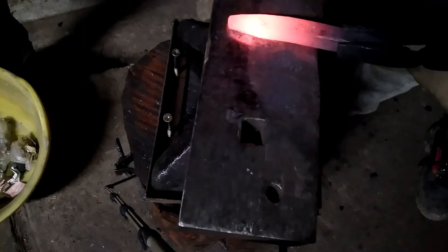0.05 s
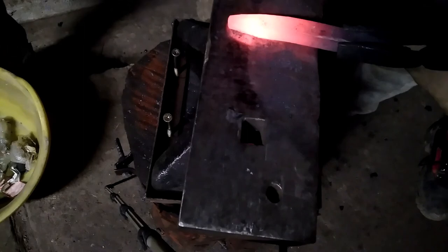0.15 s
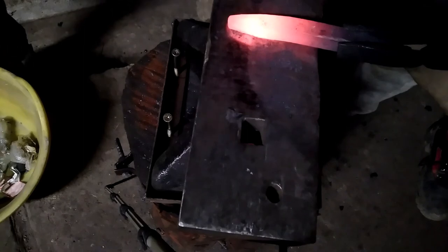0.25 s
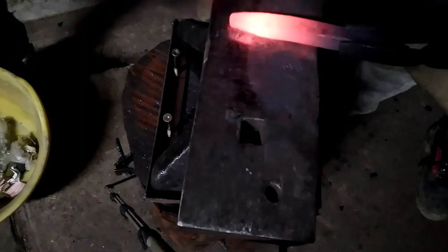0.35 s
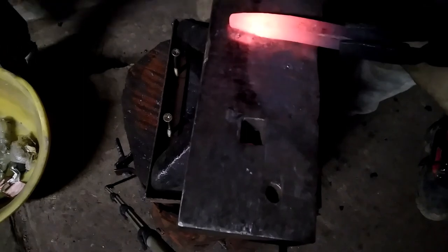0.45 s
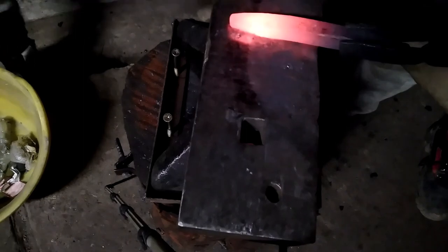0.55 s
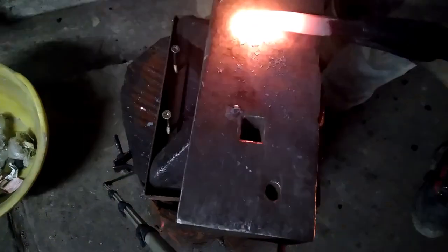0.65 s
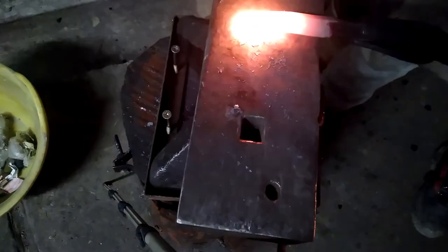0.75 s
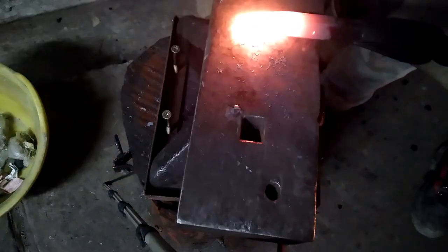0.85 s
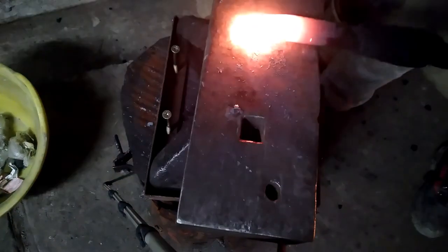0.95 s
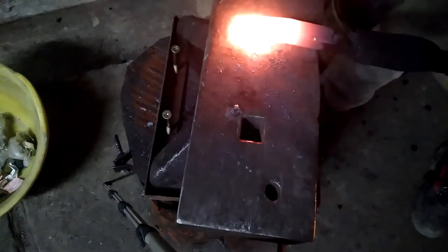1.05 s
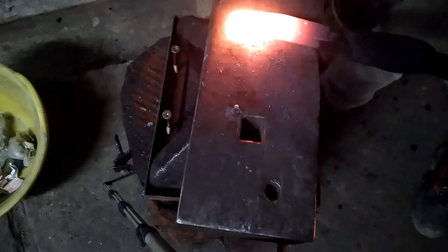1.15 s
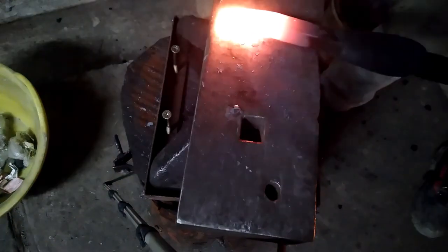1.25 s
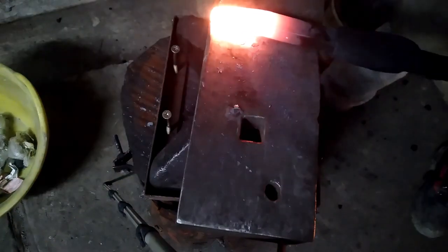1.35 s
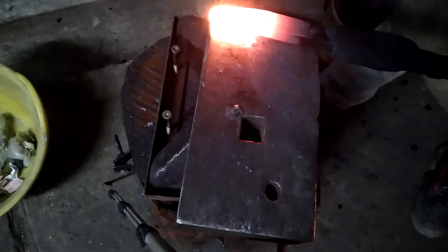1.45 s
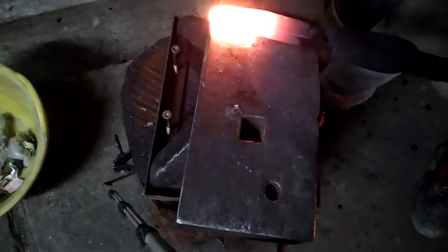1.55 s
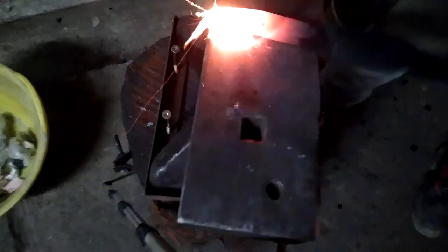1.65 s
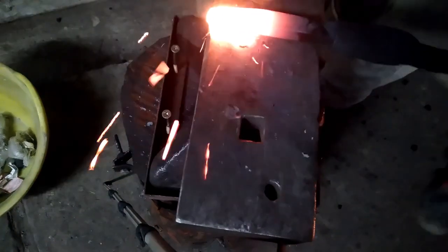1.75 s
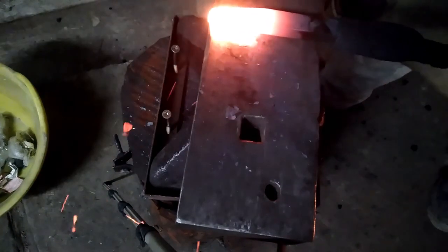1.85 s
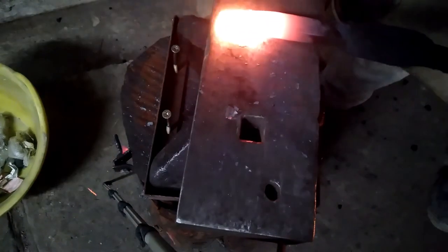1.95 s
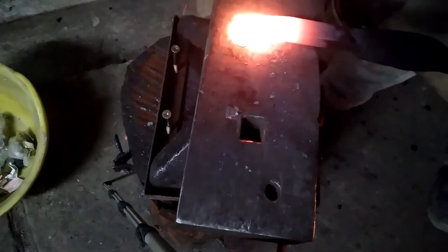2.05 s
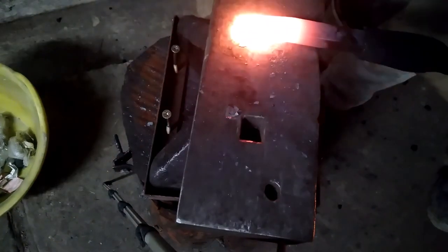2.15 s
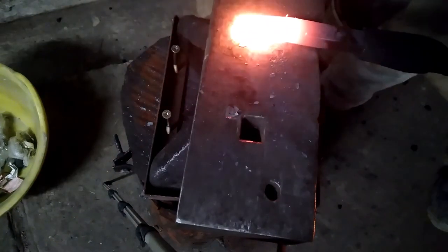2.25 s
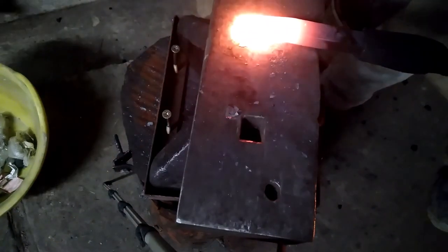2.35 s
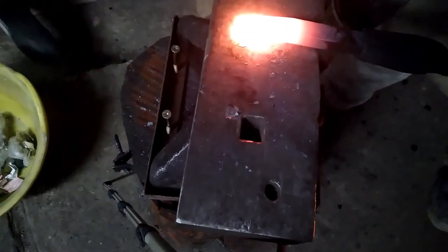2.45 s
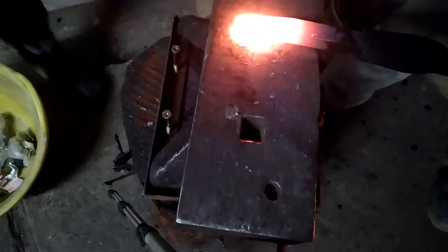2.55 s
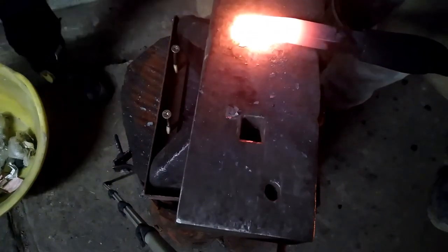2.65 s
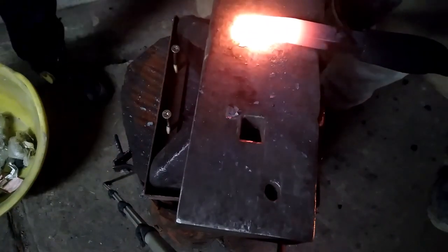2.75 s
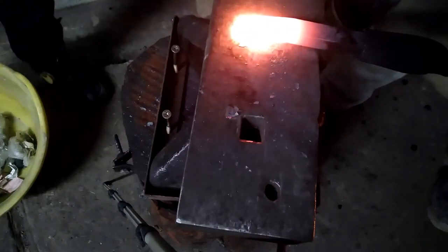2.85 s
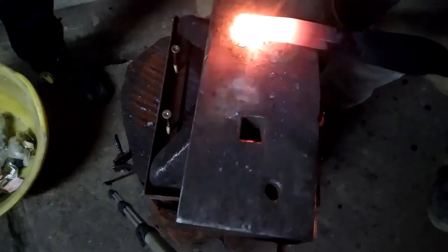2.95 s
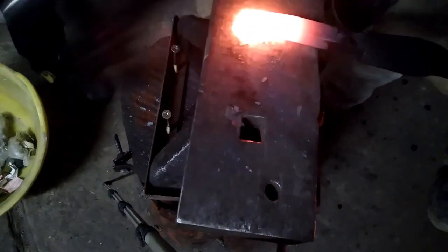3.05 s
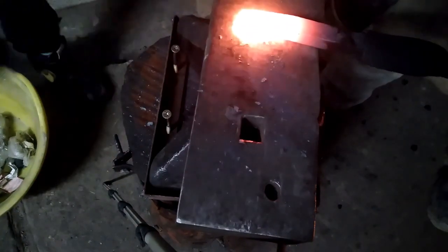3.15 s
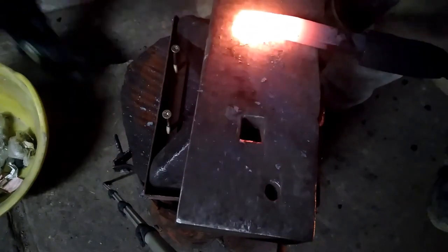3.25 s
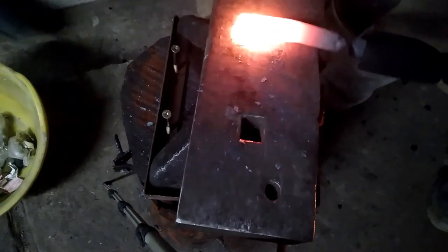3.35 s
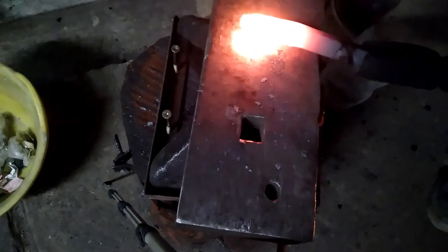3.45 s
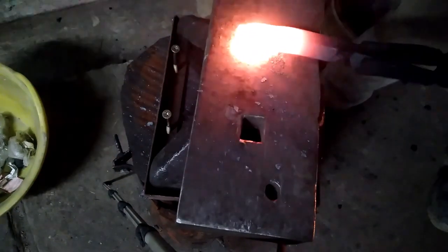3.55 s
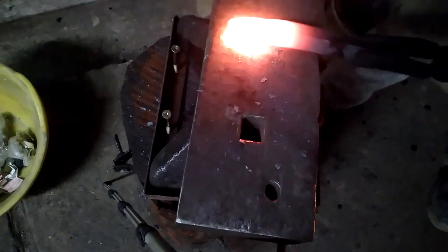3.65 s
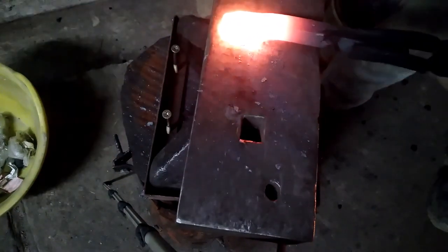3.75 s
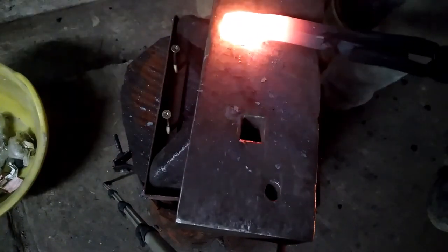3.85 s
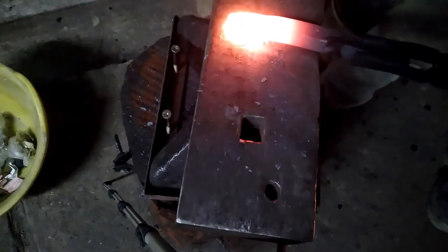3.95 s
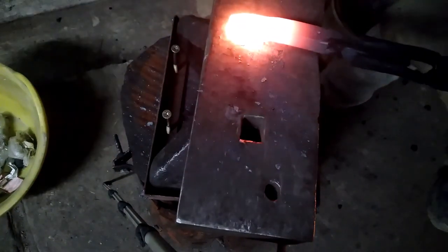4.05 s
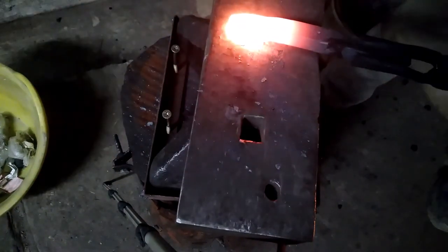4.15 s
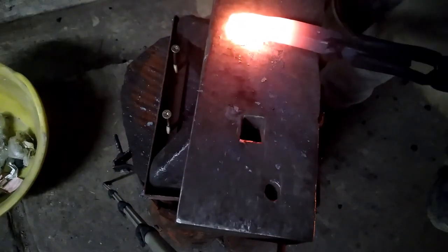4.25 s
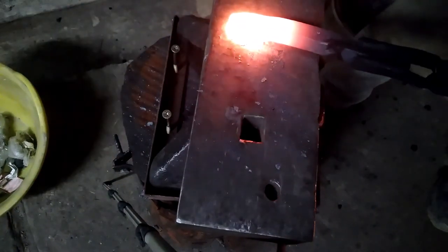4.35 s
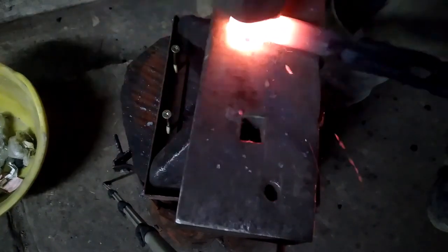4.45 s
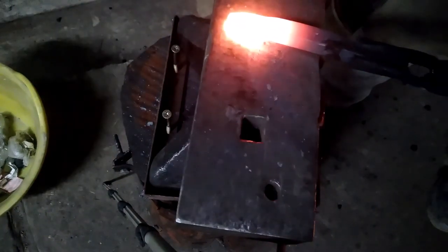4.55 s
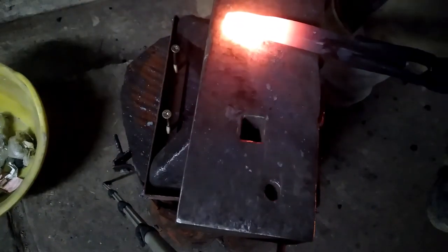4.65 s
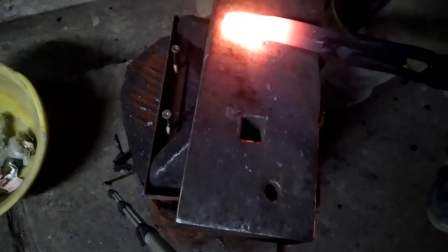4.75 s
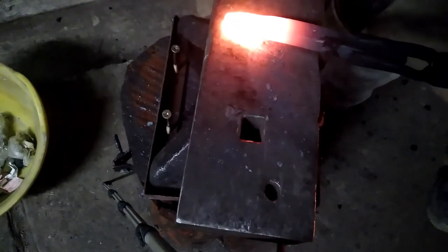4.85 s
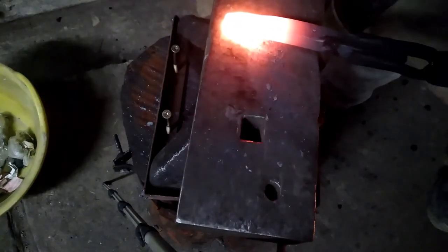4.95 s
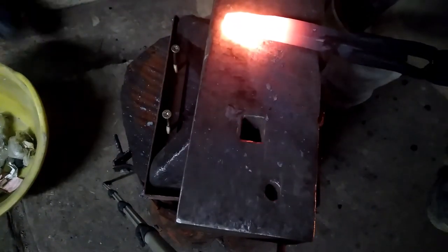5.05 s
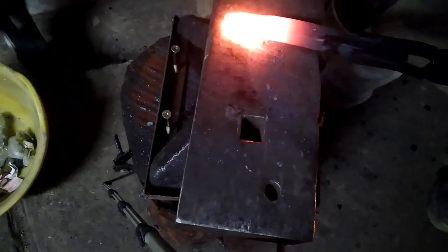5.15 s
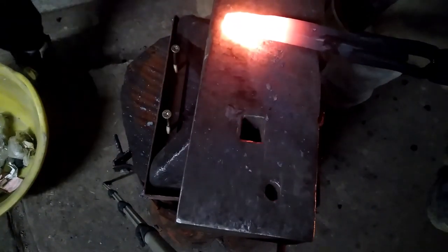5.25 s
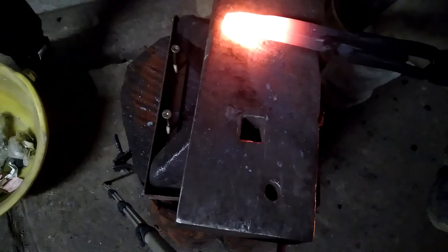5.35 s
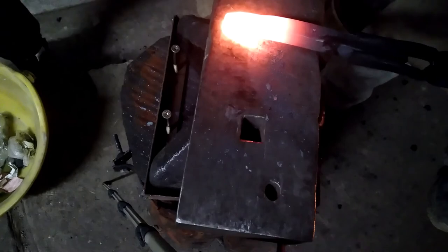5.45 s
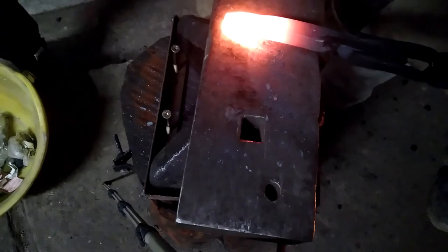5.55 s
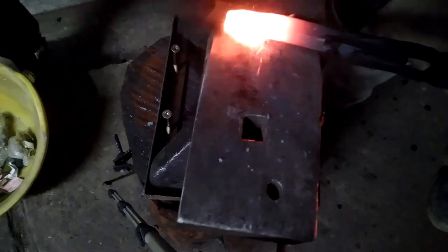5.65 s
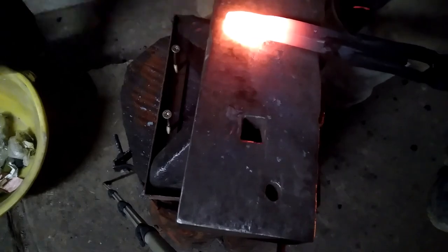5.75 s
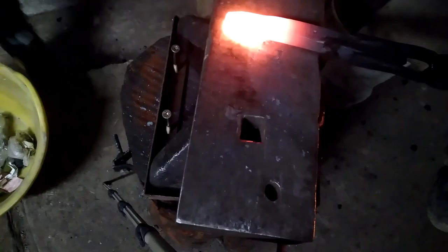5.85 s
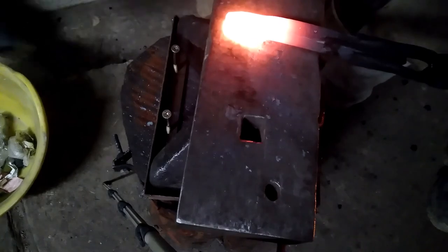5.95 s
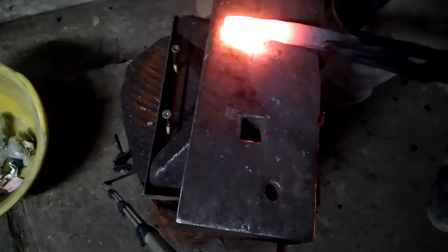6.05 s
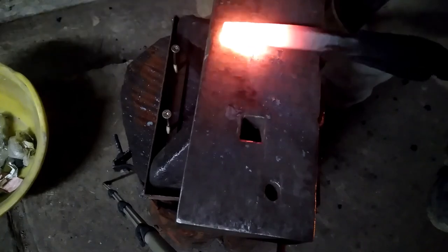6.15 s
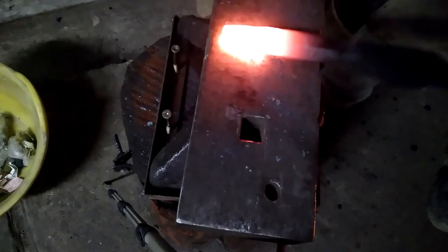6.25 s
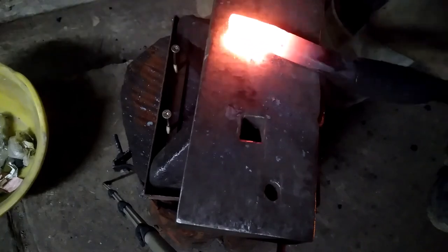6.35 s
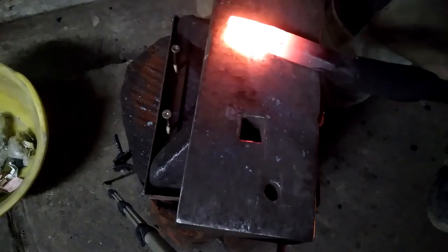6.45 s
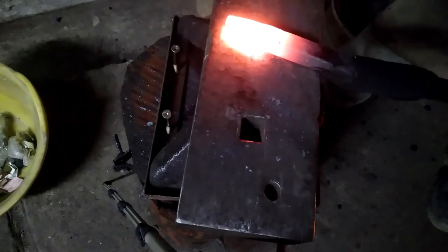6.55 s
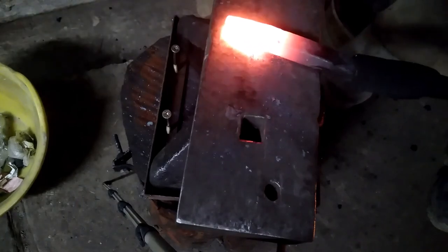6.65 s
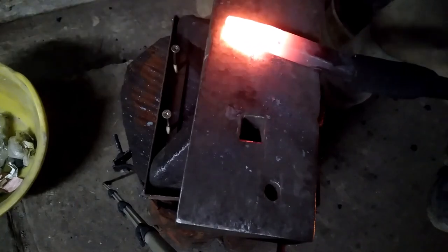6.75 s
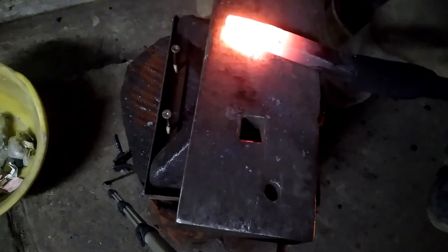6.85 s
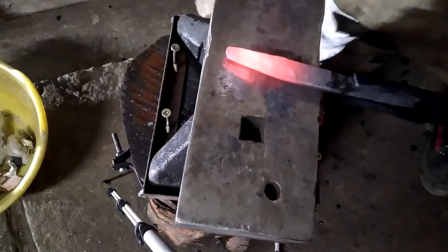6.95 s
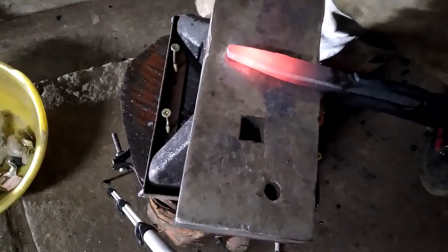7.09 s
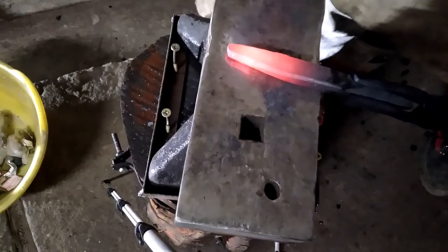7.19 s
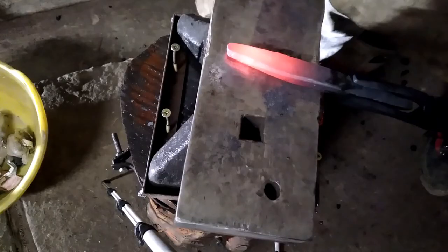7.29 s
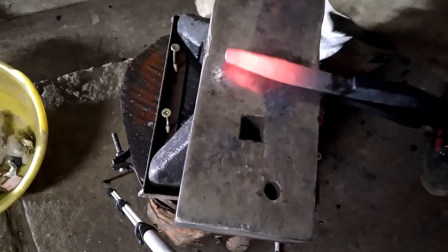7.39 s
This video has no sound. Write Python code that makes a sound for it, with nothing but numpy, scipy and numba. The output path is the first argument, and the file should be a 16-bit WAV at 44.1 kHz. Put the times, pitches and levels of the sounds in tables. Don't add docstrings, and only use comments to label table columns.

```python
import sys
import numpy as np
from scipy import signal
from scipy.fft import rfft, irfft
from scipy.io import wavfile
from scipy.ndimage import uniform_filter1d
from numba import njit

SR = 44100
rng = np.random.default_rng(int(sys.argv[2]) if len(sys.argv) > 2 else 0)


def output_pcm(signal):
    pcm = np.clip(np.atleast_2d(signal).T, -1, 1) * 32767
    wavfile.write(sys.argv[1], SR, np.round(pcm).astype(np.int16))


def volts_from_db(level):
    exponent = np.asarray(level, float) / 20
    return 10 ** exponent


N = 327222
HZ = np.fft.rfftfreq(N, 1 / SR)


def on_log(table, hz, axis=1):
    rows = np.array(table)
    return np.interp(np.log(hz + 1), np.log(rows[:, 0]), rows[:, axis])


def colour(x, table):
    cepstrum = irfft(np.log(volts_from_db(on_log(table, np.fft.rfftfreq(4096, 1 / SR)))))
    one_sided = cepstrum[:2048] * np.r_[1, 2 * np.ones(2047)]
    response = irfft(np.exp(rfft(one_sided, 4096)))[:2048]
    response = response / np.linalg.norm(response)
    return signal.fftconvolve(np.atleast_2d(x), response[None], axes=1)[:, :N]


def add(track, sound, s):
    i = int(s * SR)
    track[..., i:i + sound.shape[-1]] += sound[..., :N - i]


def highpass(x, order, hz):
    return signal.sosfilt(signal.butter(order, hz, "high", fs=SR, output="sos"), x)


def strike(modes, length_s, scatter_db, turn, contact_s, smear_hz=0):
    t = np.arange(int(length_s * SR)) / SR
    hz, db, t60 = np.transpose(modes)[:, :, None]
    chance = rng.standard_normal((2, len(modes), 1))
    size = volts_from_db(db + scatter_db * chance[0]) * 1000 ** (-t / t60) * (1 - np.exp(-t / contact_s))
    steps = rng.standard_normal((len(modes), len(t) // 64 + 1))
    steps = np.repeat(steps, 64, axis=1)[:, :len(t)]
    wander = np.cumsum(steps, axis=1) * np.sqrt(2 * np.pi * smear_hz / SR / 64)
    phase = 2 * np.pi * hz * t + wander
    return np.array([np.sum(size * np.sin(phase + side * turn * chance[1]), 0) for side in (1, -1)])


def burst(t60, like):
    t = np.arange(SR // 4) / SR
    mid, side = rng.standard_normal((2, len(t))) * 1000 ** (-t / t60)
    return np.array([mid + (1 - like) * side, mid - (1 - like) * side])


def stereo_noise(like):
    mid, side = rfft(rng.standard_normal((2, N))) * np.sqrt([(1 + like) / 2, (1 - like) / 2])
    return irfft(np.array([mid + side, mid - side]), N)


def walk(rate):
    k = int(SR / rate)
    return 1.9 * uniform_filter1d(np.repeat(rng.standard_normal(N // k + 1), k), k)[:N]


def blown(noise, peaks):
    gain = sum(volts_from_db(db) / (1 + 2j * (HZ - hz) / width) for hz, width, db in peaks)
    return irfft(rfft(noise) * gain, N) * np.sqrt(SR / np.pi / peaks[0][1])


def rumble():
    low = signal.lfilter(*signal.butter(2, 115, fs=SR), stereo_noise(.9 + 0 * HZ))
    return volts_from_db(-56.5) * low / low.std()


# (frequency [Hz], width [Hz], level [dB])
WHISTLE = [(1058, 37, 4)]


def whistle(noise):
    t = np.arange(N) / SR
    since_peak = t - 1.9
    rise_db_per_s, fall_db_per_s = 4.5, 8
    swell_db = np.minimum(rise_db_per_s * since_peak, -fall_db_per_s * since_peak)
    return blown(noise, WHISTLE) * volts_from_db(-54.5 + swell_db + 2.2 * walk(6.2)) * (t > 0.56)


# (time [s], roar level [dB])
FIRE = [(0.0, -58), (0.25, -62), (0.76, -47.5), (1.3, -51.5), (1.6, -43), (2.3, -42), (2.67, -42),
        (3.3, -44.5), (3.65, -44.5), (4.0, -51), (4.15, -45), (5.0, -45.5), (5.25, -53), (5.45, -51),
        (6.26, -57.5), (6.36, -44), (6.86, -65), (7.42, -65)]
# (frequency [Hz], level per Hz [dB])
ROAR = [(15, -41), (25, -10), (61, -2.5), (91, -26), (113, -13.5), (238, -0.5), (348, -4), (405, -3.5),
        (950, -12), (1240, -40.5), (2090, -120)]
# (frequency [Hz], level per Hz [dB])
HISS = [(530, -29), (900, -7.5), (1060, -10), (1150, -8.5), (1390, -10.5), (2530, -9), (4240, -19.5),
        (8950, -18), (15000, -45.5)]
# (frequency [Hz], width [Hz], level [dB])
BURNER = [(244.7, 6, 0), (292, 14, -6.5), (386, 9.5, -5), (588, 3.5, -6), (667, 6.2, -14)]


def fire():
    roar_db = np.interp(np.arange(N) / SR, *np.transpose(FIRE))
    above_usual_db = roar_db + 46
    hiss_db = -49 + 1.0 * above_usual_db + 0.6 * walk(4) + 1.1 * walk(29)
    burner_db = -54 + 0.8 * above_usual_db + 2.5 * walk(5.4)
    air = stereo_noise(np.exp(-HZ / 500))
    roar = colour(air, ROAR) * volts_from_db(roar_db + 1.2 + 2.2 * walk(14))
    hiss = colour(stereo_noise(np.exp(-HZ / 700)), HISS) * volts_from_db(hiss_db)
    burner = blown(air, BURNER) * volts_from_db(burner_db)
    return roar + hiss + burner + whistle(air)


# (frequency [Hz], level per Hz [dB])
CRACK = [(26, -28.5), (45, -10.5), (120, -5.5), (447, -12), (844, -7), (1080, -13), (1990, -10.5),
         (2540, -19), (3400, -12), (3660, -19.5), (9030, -20), (15500, -48.5)]


def crack(db):
    shock = volts_from_db(-0.5) * burst(0.013, like=0.42) + volts_from_db(-8.0) * burst(0.2, like=0.9)
    tilt_db_per_octave = 0.65 - 0.0667 * db
    tilt = [(1000, 0), (16000, 4 * tilt_db_per_octave)]
    return volts_from_db(db + 10.5) * colour(colour(shock, CRACK), tilt)


# (time [s], crack level [dB], boom level [dB], hammer note level [dB], loose iron level [dB])
BLOWS = [
    (0.265, -9, -19.5, -16, -14.5),
    (1.656, -5.5, -14, -28, -23.5),
    (2.971, -9, -18.5, -35, -13.5),
    (4.368, -12, -14.5, -25, -23),
    (5.625, -9.5, -18, -28, -12.5),
    (7.138, -16, -20.5, -25.5, -15.5),
]
# (frequency [Hz], level [dB], time to fall 60 dB [s])
IRON = [(815, -7, .15), (900, -8, .15), (1810, -12, .15), (1945, -8, .22), (3495, -14, .2),
        (3900, -11, .12), (4620, -17, .1), (5800, -17, .12), (5885, -17, .12), (7450, -18, .1),
        (8720, -19, .08), (9095, -14, .08)]
# (frequency [Hz], level [dB], time to fall 60 dB [s])
STAND = [(57.9, -5, 1.37), (62.07, -6.5, 1.3), (82.7, -9, 0.51), (105.7, -10, .9), (114.7, -5, 1.27),
         (164.6, -10, 0.66), (192.8, -3.5, 0.53), (214.8, -9.5, .5)]


def blows():
    clang, boom = np.zeros((2, N)), np.zeros((2, N))
    for s, db, boom_db, hammer_db, iron_db in BLOWS:
        add(clang, crack(db), s)
        iron = strike(IRON, 0.9, scatter_db=3.0, turn=.9, contact_s=.002, smear_hz=45)
        add(clang, volts_from_db(iron_db + 3) * iron, s)
        note = [(3243, hammer_db + 2, .6)]
        add(boom, strike(note, .8, scatter_db=3, turn=0.97, contact_s=0.007, smear_hz=7.1), s)
        stand = strike(STAND, 1.5, scatter_db=0.5, turn=0.11, contact_s=0.017, smear_hz=3.2)
        add(boom, volts_from_db(boom_db + 1.5) * stand, s)
    return clang, boom


# (main note level [dB], its time to fall 60 dB [s], left minus right [dB],
# 6.6 kHz note level [dB], 7.8 kHz note level [dB])
RINGS = [
    (-32.5, 0.7, -6.5, -42, -43),
    (-7.5, 0.72, -3, -19, -19.5),
    (-18, 0.71, -7.5, -39, -39),
    (-22, 0.59, -10.5, -42, -29),
    (-8, 0.47, -1, -38.5, -21),
    (-6.5, 0.61, -3, -43.5, -58),
]
# (time [s], change of level [dB])
BAR_BACK = [
    (1.906, -2.5),
    (4.671, 5.5),
]
MAIN_NOTE_HZ = 3451.5


def anvil():
    out, t = np.zeros((2, N)), np.arange(int(1.3 * SR)) / SR
    for (s, *_), (db, t60, pan_db, db_6k, db_7k) in zip(BLOWS, RINGS):
        pair = [(MAIN_NOTE_HZ, db + 10.0, 0.92 * t60), (MAIN_NOTE_HZ, db - 15, 2.0 * t60)]
        main = strike(pair, 1.3, scatter_db=0, turn=.25, contact_s=.03)
        high_notes = [(6652, db_6k + 8, .3), (7769, db_7k + 8, .65)]
        upper = strike(high_notes, 1.3, scatter_db=3, turn=0.97, contact_s=0.017)
        damping_db = sum(change_db * (t > at - s) for at, change_db in BAR_BACK if at > s)
        pan = volts_from_db(np.array([[pan_db], [-pan_db]]) / 2)
        add(out, volts_from_db(damping_db) * main * pan + upper, s)
    return out


# (first landing [s], level [dB], first flight [s], share kept by each flight [0-1],
# loss per bounce [dB])
DROPS = [
    (0.357, -15, .04, .6, 5),
    (1.909, -3.5, .082, .6, 3.5),
    (3.024, -5, .047, .58, 6),
    (4.416, -10.5, .029, .6, 2),
    (4.671, -4.5, .074, .39, 8.5),
]
# (time [s], level [dB], jingle level [dB], thud level [dB])
TAPS = [
    (6.306, -38, -35, -2.5),
]


def landings():
    rows, shortest_s = list(TAPS), .011
    for (s, db, flight_s, kept, loss_db), count in zip(DROPS, (1, 13, 3, 2, 5)):
        k = np.arange(count)
        flights = shortest_s + (flight_s - shortest_s) * kept ** k
        times = s + np.cumsum(flights) - flights
        for at, level_db in zip(times, db - loss_db * k):
            jingle_db = -6 + 1.5 * level_db
            rows.append((at, level_db, jingle_db, -21.5))
    return rows


# (frequency [Hz], level per Hz [dB])
CLACK = [(400, -25), (750, -0.5), (950, 2.5), (1600, -4.5), (2800, -6.5), (3500, -12.5), (9000, -21),
         (12000, -36.5)]
# (frequency [Hz], level [dB], time to fall 60 dB [s])
BAR = [(876, -14, 0.06), (915, 8, 0.053), (1150, -8, 0.0092), (1460, -8, 0.013)]
# (frequency [Hz], level [dB], time to fall 60 dB [s])
TONGS = [(3255, -7, .1), (3451, -10, .3), (3895, -1, .13), (3985, -1, .07), (5885, -10, .1),
         (6040, -17, .08), (6660, -15, .12), (7320, -13, .06), (9120, -8, .04), (9520, -14, .08)]


def loose_iron():
    out = np.zeros((2, N))
    for s, db, jingle_db, thud_db in landings():
        duller = [(2800, 0.0054), (8000, 0.8 * db)]
        add(out, volts_from_db(db - 3) * colour(colour(burst(0.017, like=.5), CLACK), duller), s)
        add(out, volts_from_db(db - 17) * strike(BAR, .1, scatter_db=1.5, turn=.4, contact_s=.001), s)
        jingle = strike(TONGS, 0.33, scatter_db=2.0, turn=0.94, contact_s=0.0007, smear_hz=50.7)
        add(out, volts_from_db(jingle_db + 2.0) * jingle, s)
        thud = strike(STAND[5:], .8, scatter_db=4.5, turn=.15, contact_s=0.0037)
        add(out, volts_from_db(db + thud_db) * thud, s)
    return out


# (time [s], fade out [s], fade in [s], main note level [dB], boom level [dB])
CHANGES = [
    (.68, 0.039, 0.032, -46.5, -36.5),
    (7.022, 0.056, 0.028, -78, -43.5),
]


def lingering():
    ring, boom = np.zeros((2, N)), np.zeros((2, N))
    for s, _, _, ring_db, boom_db in CHANGES:
        note = [(MAIN_NOTE_HZ, ring_db, 1.3)]
        add(ring, strike(note, 1.8, scatter_db=7.5, turn=.15, contact_s=.01), s)
        add(boom, volts_from_db(boom_db) * strike(STAND[:2], 1.7, scatter_db=2.5, turn=.2, contact_s=.01), s)
    return ring, boom


# (time [s], level [dB], first crunch above the rush [dB])
SCUFFS = [(0.709, -37, -1), (0.8594, -50.5, 14), (0.9394, -44.5, 5), (1.123, -44.5, 3), (1.2978, -38.5, 12),
          (1.494, -30, -3), (2.3354, -25.5, -3), (2.3565, -33.5, 12), (2.5697, -24.5, -4),
          (2.769, -30.5, 1), (2.846, -31.5, 6.5), (2.8844, -34, 12.5), (3.425, -44.5, 16),
          (3.7444, -38, -2), (3.7988, -37, 4), (4.021, -30, 2), (4.224, -41, 8.5), (4.29, -35.5, 4),
          (4.9013, -39, 0), (4.969, -36.5, 10), (5.349, -46, -7.5), (5.9494, -43.5, 8.5),
          (6.132, -43.5, 9.5), (6.2423, -56, 20), (6.3058, -38.5, 21), (6.4298, -68.5, -2), (6.549, -49, 3),
          (6.6014, -47.5, 10.5), (6.738, -48, 0)]
# (frequency [Hz], level per Hz [dB])
GRIT = [(290, -28), (500, -2.5), (849, -15), (1030, -10.5), (1350, -14), (3520, -14), (8360, -16.5),
        (12700, -32.5), (15000, -35)]


def boots():
    body, top, t = np.zeros(N), np.zeros(N), np.arange(SR) / SR
    t60 = 0.54
    for s, db, crunch_db in SCUFFS:
        rise = volts_from_db(db - 5.5) * (1 - np.exp(-t / 0.017))
        crunch = volts_from_db(db - 7 + crunch_db) * np.exp(-t / 0.0078)
        add(body, rise * 1000 ** (-t / t60), s)
        add(top, rise * 1000 ** (-t / (0.21 * t60)) + crunch, s)
    uneven = volts_from_db(0.29 * rng.exponential(size=N) + 0.5 * walk(60))
    grains = colour(stereo_noise(np.exp(-HZ / 900)) * uneven, GRIT)
    treble = highpass(grains, 2, 3500)
    return top * treble + body * (grains - treble)


# (time [s], level [dB])
FLAKE = [(0.845, -48), (1.122, -44), (3.59, -45), (3.6215, -36), (3.644, -43), (3.6594, -50),
         (3.688, -45.5)]
# (frequency [Hz], level [dB], time to fall 60 dB [s])
FLAKE_NOTES = [(5680, -6, 0.037), (6540, -4, 0.04), (7600, 9, 0.014)]


def flake():
    out = np.zeros((2, N))
    for s, db in FLAKE:
        add(out, volts_from_db(db - 1.0) * strike(FLAKE_NOTES, .1, scatter_db=7.0, turn=1.0, contact_s=0.00046), s)
    return out


# (frequency [Hz], time to fall 60 dB [s], likeness of left and right [0-1])
ROOM = [(59.6, 1.2, 1), (152, 0.81, .95), (420, 0.33, 0.7), (1070, 0.51, 0.1), (2960, 0.45, 0.2),
        (6940, 0.32, 0), (13000, 0.26, 1)]


def room(dry):
    t = np.arange(SR) / SR
    like = np.clip(on_log(ROOM, HZ, axis=2), 0, 1)
    noise, tail = rfft(stereo_noise(like)), 0
    for hz in 60 * 2 ** np.arange(0, 8.5, .5):
        octaves_away = np.clip(np.log2((HZ + 1) / hz), -.5, .5)
        band = irfft(noise * np.cos(np.pi * octaves_away) ** 2, N)[:, :SR]
        tail = tail + band * 1000 ** (-t / on_log(ROOM, hz))
    tail = tail * (1 - np.exp(-t / 0.0027)) / np.sqrt(SR)
    return signal.fftconvolve(dry, tail, axes=1)[:, :N]


def scene():
    background = rumble() + fire()
    clang, boom = blows()
    old_ring, old_boom = lingering()
    boom = boom + old_boom
    ring = anvil() + old_ring
    loose = loose_iron() + flake()
    walls = room(volts_from_db(19.0) * clang + volts_from_db(6.5) * ring + volts_from_db(8.5) * loose + volts_from_db(0.5) * boom)
    return background + clang + boom + ring + loose + walls + boots()


JOLTS = [(0.53, 0.08), (-0.23, -0.26), (0.14, -0.87), (-0.036, 0.36), (0.2, -0.25), (0.22, -0.24)]


def jolts():
    out, t = np.zeros((2, N)), np.arange(SR) / SR
    swing = (1 - np.exp(-t / 0.0074)) * np.exp(-t / 0.056)
    for (s, *_), size in zip(BLOWS, JOLTS):
        add(out, 2.0 * np.outer(size, swing), s)
    return signal.lfilter(*signal.butter(1, 2.5, "high", fs=SR), out)


@njit
def limit(x, top, ratio, attack, release):
    y, level = np.empty_like(x), 0.
    for i in range(x.shape[1]):
        peak = max(abs(x[0, i]), abs(x[1, i]))
        level += (peak - level) * (attack if peak > level else release)
        y[:, i] = x[:, i] * min(1., top / (level + 1e-9)) ** (1 - 1 / ratio)
    return y


def sizzle(x, db, above_hz):
    loudness = uniform_filter1d(np.abs(highpass(x, 6, 4500)), size=400, axis=1) ** 1.87
    return volts_from_db(db) * loudness * highpass(rng.standard_normal(x.shape), 4, above_hz)


def thin_top(x, from_hz, under_db, scatter_db):
    hz, _, cells = signal.stft(x, SR, nperseg=2048)
    power = np.abs(cells[:, :1024]).reshape(2, 64, 16, -1) ** 2
    patch_db = 10 * np.log10(power.sum(axis=2).mean(axis=0) + 1e-18)
    scatter = scatter_db * rng.standard_normal(patch_db.shape)
    weak = patch_db < patch_db.max(axis=0) - under_db + scatter
    cells[:, :1024] *= 1 - np.repeat(weak, 16, axis=0) * (hz[:1024, None] > from_hz)
    return signal.istft(cells, SR, nperseg=2048)[1][:, :N]


# (start [s], end [s])
NO_TREBLE = [(.06, .15), (6.778, 6.875), (6.915, 7.13)]


def gate(x):
    t = np.arange(N) / SR
    shut = sum(1. * (t > start) * (t < end) for start, end in NO_TREBLE)
    shut = uniform_filter1d(shut, size=600)
    return x - shut * signal.sosfiltfilt(signal.butter(6, 850, "high", fs=SR, output="sos"), x)


def change_scene(x):
    t = np.arange(N) / SR
    for s, fade_out, fade_in, *_ in CHANGES:
        x = x * np.clip(np.maximum((s - t) / fade_out, (t - s) / fade_in), 0, 1) ** 1.9
    return x


def roll_off(x):
    return signal.sosfilt(signal.butter(12, 15610, fs=SR, output="sos"), x)


def record(dry):
    heard = signal.sosfilt(signal.butter(2, 10200, fs=SR, output="sos"), dry)
    held = limit(heard, .85, 8., .05, .0006)
    held = held + sizzle(held, db=7, above_hz=9300)
    clipped = np.clip(held + jolts(), -.99, .99)
    thinned = thin_top(clipped, from_hz=9900, under_db=36, scatter_db=11.5)
    mix = change_scene(gate(thinned))
    return roll_off(np.clip(mix, -1, 1))


dry = scene()
out = record(dry)
output_pcm(out)
```